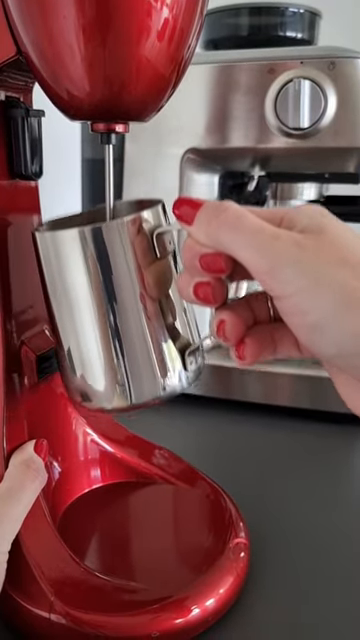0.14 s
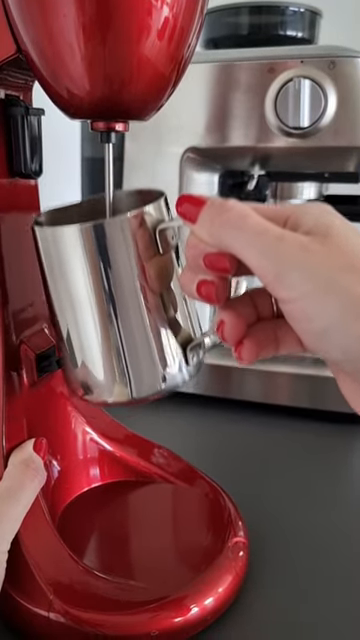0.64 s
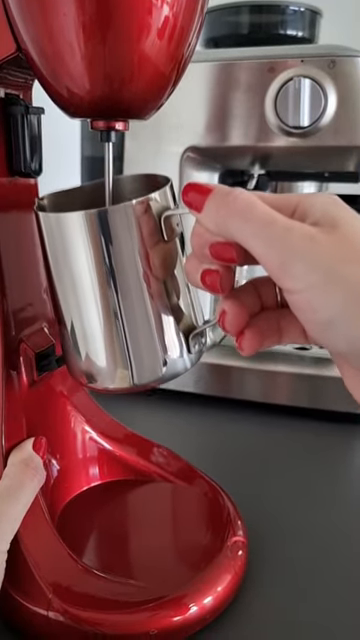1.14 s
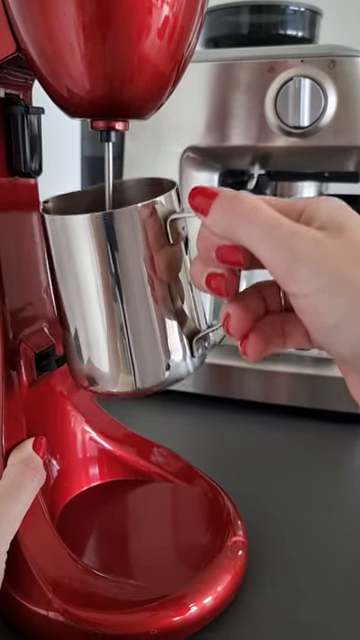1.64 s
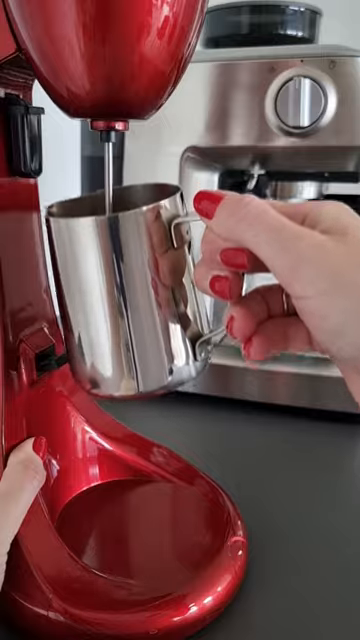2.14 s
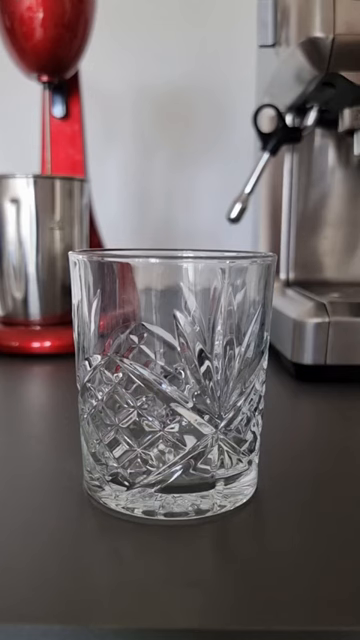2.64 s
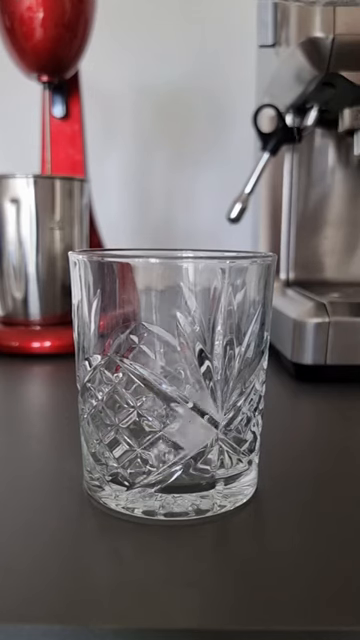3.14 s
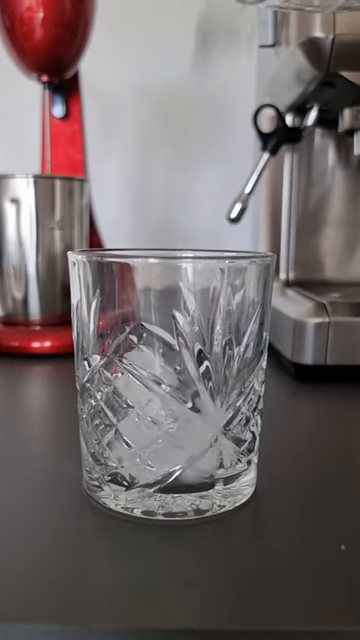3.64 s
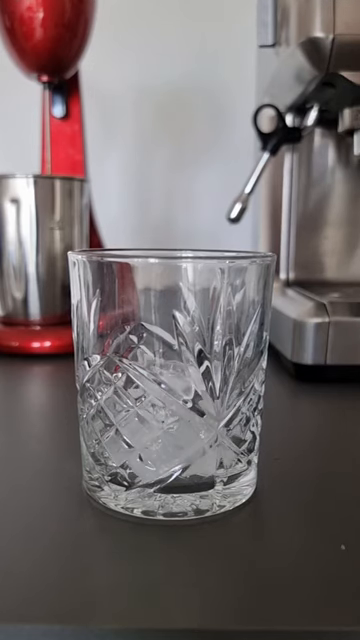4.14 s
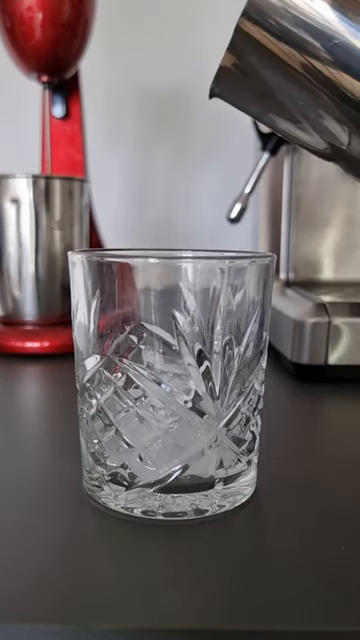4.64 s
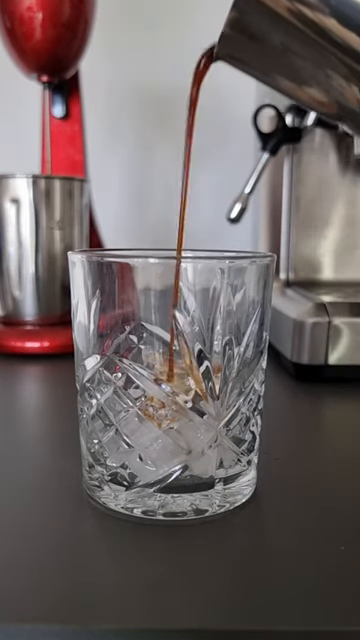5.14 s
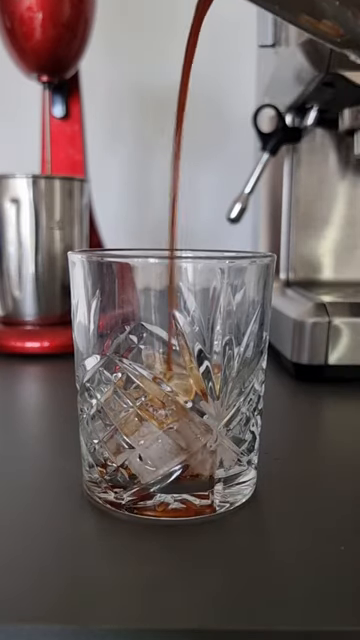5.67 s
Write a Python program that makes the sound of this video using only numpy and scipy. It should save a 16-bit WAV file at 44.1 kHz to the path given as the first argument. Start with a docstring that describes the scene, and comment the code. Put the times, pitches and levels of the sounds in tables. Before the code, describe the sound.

Steady buzzing whine of a handheld-size drink mixer in metal, then ice clattering and ringing in a heavy glass, then faint fridge hum.

```python
"""Spindle mixer, ice in a tumbler, quiet kitchen

Three moments with short fades between them, over a humming refrigerator and a noise floor.
A spindle mixer whines in a steel jug: sines on the orders of its shaft, over coloured noise.
Ice is handled, then dropped into a thick glass tumbler: clicks ring modes of ice, base and worktop, and
paired sines beat as the glass wall rings; feedback delays are the kitchen. Then hum and a thin whine stay."""
import sys
import numpy as np
from scipy import signal
from scipy.fft import rfft, irfft, next_fast_len
from scipy.io import wavfile
from scipy.ndimage import uniform_filter1d

SR = 44100
rng = np.random.default_rng(int(sys.argv[2]) if len(sys.argv) > 2 else 0)


def field_ratio(decibels):
    """Amplitude ratio for a level in dB (20 dB per decade); scalars and array-likes work."""
    return 10 ** (np.asarray(decibels, dtype=float) / 20)


def master(y):
    """Save y as 16-bit WAV."""
    cut = np.clip(np.atleast_2d(y).T, -1, 1)
    pcm = np.round(cut * 32767)  # scale
    wavfile.write(sys.argv[1], SR, pcm.astype(np.int16))


N = 254898

# the three moments; the first starts in full, the last outruns the sound: start/s, end/s
CUTS = [(-.1, 2.354), (2.378, 4.284), (4.306, 5.9)]
MIXER_SIZE = round(CUTS[0][1] * SR / 2) * 2   # samples, an even number
MAINS_HZ = 50
# course of the spindle: t/s, speed/Hz, level of the once-a-turn tone in the middle/dB rms, left over right/dB
SPINDLE = [(0.03, 384.2, -17, 16.0), (0.11, 385.2, -17, 12.0), (0.25, 387.2, -18, 10.5),
           (0.68, 388.5, -15, 9.5), (0.79, 386.7, -16, 10.5), (0.88, 382.6, -21, 16.0),
           (0.95, 383.4, -16, 14.0), (1.23, 382.3, -17, 14.5), (1.35, 379.2, -18, 17.0),
           (1.43, 379.8, -18, 12.5), (1.8, 378.4, -18, 13.0), (2.1, 375.7, -20, 10.0),
           (2.33, 375.8, -21, 15.0)]
# strong motor tones at order x speed + sideband x twice the mains: order, sideband,
# left and right level/dB rms in the jug's first position, the same in its second, lead of the left/rad
TONES = [(1, -1, -46, -60, -40, -44, 1.5), (1, 1, -35, -38, -31, -31, 1.5),
         (2, -1, -41, -46, -37, -40, -2.6), (2, 0, -42, -33, -32, -32, 1.9),
         (3, 0, -28, -33, -27, -40, 0.9), (3, 1, -33, -38, -34, -39, -2.8),
         (4, 0, -28, -34, -27, -34, -2.6), (5, 0, -41, -50, -40, -43, 2.3),
         (6, 0, -31, -28, -43, -33, -2.9), (7, 0, -40, -34, -46, -42, -0.9),
         (7, 1, -42, -35, -40, -33, -0.3), (8, 0, -41, -31, -43, -29, -0.5),
         (8, 1, -41, -36, -47, -35, 2.0), (8, 2, -43, -37, -50, -39, 1.0), (9, -1, -44, -39, -43, -38, 0.5),
         (9, 0, -39, -39, -38, -32, 0.4), (9, 1, -46, -38, -44, -40, 0.0),
         (10, 0, -36, -27.5, -42, -34, 0.3), (11, 0, -43, -37, -42, -44, 2.0),
         (13, 0, -49, -36, -50, -45, -2.8), (13, 1, -52, -40, -55, -44, -0.1),
         (14, -1, -47, -45, -48, -39, 0.4), (16, 1, -38, -42, -45, -46, -1.6),
         (17, 0, -43, -47, -40, -46, -2.3), (20, -1, -43, -38, -48, -47, -0.3),
         (20, 0, -48, -39, -47, -40, 0.4)]
# balance of the mixer's churn, and of the handling rustle: f/Hz, left over right/dB
CHURN_PAN = [(100, -1.5), (400, 1), (600, 0), (950, 3.5), (1370, -5), (1800, 5.5), (2450, 1), (3400, -6.5),
             (5000, -4.5), (8000, -1), (15000, -1.5)]
# phase between the sides, for noise and faint tones: f/Hz, lead of the left/rad
CHURN_LEAD = [(60, 0.27), (400, 1.1), (590, 0.15), (880, 3.1), (1010, 2.2), (1370, 3.4), (1800, 5.9),
              (2100, 4.3), (2400, 9.5), (2900, 5.2), (3250, 15), (3700, 10), (5250, 19), (6500, 21.7),
              (8010, 26.1), (11300, 22.1), (16100, 35)]
# how alike the sides of the room floor and rustle are: f/Hz, likeness/-1 to 1
FLOOR_LIKENESS = [(60, 0.94), (150, 0.4), (400, 0.13), (15000, 0.05)]
# modes of the ice when struck: f/Hz, relative level/dB, T60/s
CRACK = [(2000, -4, 0.0035), (2830, -1, 0.008), (3754, 1, 0.0055), (4780, -3, .005), (5930, 0, 0.004),
         (6650, -8, 0.0095), (7400, -19, 0.021)]
# modes of the thick glass base when struck: f/Hz, relative level/dB, T60/s
KNOCK = [(606, -9.5, .02), (759, -1, 0.011), (910, 2, .029), (1240, -3.5, 0.026), (1644, -1, 0.014)]
# modes of the worktop when struck: f/Hz, relative level/dB, T60/s
THUD = [(209.7, -7, 0.16), (289, -6.5, .08), (415, -1, 0.049)]


def rms_one(x):
    """Scale to unit rms."""
    return x / np.sqrt(np.mean(x ** 2) + 1e-20)


def in_time(rows):
    """Columns of a curve table, one value a sample."""
    s, *columns = np.transpose(rows)
    return [np.interp(np.arange(N) / SR, s, column) for column in columns]


def between(start, end):
    """Gain that fades in over 12 ms at the start and out over 18 ms at the end."""
    t = np.arange(N) / SR
    return np.clip((t - start) / .012, 0, 1) * np.clip((end - t) / .018, 0, 1) ** 2


def at_hz(points, hz):
    """Read a spectrum on a log-frequency axis."""
    point_hz, value = np.transpose(points)
    return np.interp(np.log(hz), np.log(point_hz), value)


def left_over_right(db):
    """Gains of left and right that differ by db."""
    return field_ratio([[db / 2], [-db / 2]])


def drift(rate, size):
    """Slow chance of rms 1: noise through a two-pole lowpass at rate Hz, drawn every 40 samples."""
    r = np.exp(-2 * np.pi * rate * 40 / SR)
    slow = signal.lfilter([1], [1, -2 * r, r * r], rng.standard_normal(size // 40 + 2002))[2000:]
    return np.interp(np.arange(size) / 40, np.arange(len(slow)), rms_one(slow))


def ring(clicks, hz, t60):
    """A two-pole resonator: a unit click sets a sine of about height 1 ringing."""
    r, w = field_ratio(-60 / (t60 * SR)), 2 * np.pi * hz / SR
    return signal.lfilter([0, np.sin(w)], [1, -2 * r * np.cos(w), r * r], clicks + 1e-18)


def banded_noise(spectrum, likeness, pan, lead, patchy_db, size):
    """Stereo noise with colour, likeness, balance and lead by frequency; its level flickers; mid rms near 1."""
    hz = np.maximum(np.arange(size // 2 + 1) * SR / size, 1)
    shared, apart = rfft(rng.standard_normal((2, size))) * field_ratio(at_hz(spectrum, hz))
    alike = np.clip(at_hz(likeness, hz), -1, 1)
    sides = left_over_right(1) ** at_hz(pan, hz) * np.exp(1j * np.outer([1, 0], at_hz(lead, hz)))
    mixed = np.sqrt(1 + alike) * shared + np.sqrt(1 - alike) * apart * [[1], [-1]]
    out = irfft(sides * mixed, size)
    out = out * field_ratio(patchy_db * drift(8.7, size))
    return np.pad(out / np.std(out.mean(axis=0)), ((0, 0), (0, N - size)))


def faint_tones():
    """Rows like those of TONES for every other order and sideband, with chance levels per jug position."""
    # level before the losses and chance below: f/Hz, level/dB rms
    faint = [(300, -64), (700, -57), (950, -60.5), (1600, -44), (2450, -47.5), (3500, -43), (4500, -49.5),
             (5300, -45.5), (8000, -55.5)]
    # balance: f/Hz, left over right/dB
    faint_pan = [(950, 3), (1800, 8.5), (2450, -1), (3400, -6), (5000, -2.5), (6300, 3.5), (8000, -7)]
    taken = [(1, 0)] + [tone[:2] for tone in TONES]   # (1, 0) is the once-a-turn tone
    rows = []
    for order in range(1, 22):
        for sideband in range(-2, 3):
            if (order, sideband) in taken:
                continue
            hz = order * SPINDLE[0][1] + sideband * 2 * MAINS_HZ
            level_db = at_hz(faint, hz) - 1.5 * abs(sideband)   # weaker away from the order
            sides_db = level_db + at_hz(faint_pan, hz) / 2 * np.array([1, -1, 1, -1])
            chance_db = np.repeat(rng.normal(0, 0.5, size=2), 2)
            lead = rng.normal(at_hz(CHURN_LEAD, hz), 0.67)   # radians
            rows.append((order, sideband, *(sides_db + chance_db), lead))
    return rows


def motor(waver_db, flutter_db, blur):
    """Shaft orders with sidebands at twice the mains; tilting the jug shifts their levels on each side."""
    size = MIXER_SIZE
    spindle_lead = 0.46   # radians by which the left leads
    speed, tone_db, pan_db = (column[:size] for column in in_time(SPINDLE))
    jug = np.interp(np.arange(size) / SR, (.8, 1.3), [0, 1])   # from first position to second, s
    sides = field_ratio([pan_db / 2, -pan_db / 2])
    middle = np.abs(sides[0] * np.exp(1j * spindle_lead) + sides[1]) / 2
    sides = sides * field_ratio(tone_db) / middle
    # the load on the disc jitters the speed
    turn = 2 * np.pi * np.cumsum(speed * (1 + blur * drift(32, size))) / SR
    torque = 2 * np.pi * 2 * MAINS_HZ * np.arange(size) / SR
    once_a_turn = sides * np.sin([turn + spindle_lead, turn])
    field = field_ratio(-56) * np.sin([torque + 0.7, torque])   # the motor's field hums at twice the mains
    out = once_a_turn + field
    for order, sideband, left_0, right_0, left_1, right_1, lead in TONES + faint_tones():
        phase = order * turn + sideband * torque + rng.uniform(0, 2 * np.pi)
        level_db = np.outer([left_0, right_0], 1 - jug) + np.outer([left_1, right_1], jug)
        level_db += waver_db * drift(1.1, size) + flutter_db * drift(13, size)
        out += field_ratio(level_db) * np.sin([phase + lead, phase])
    return np.pad(np.sqrt(2) * out, ((0, 0), (0, N - size)))   # root 2 makes the levels rms


def churn():
    """Air, brushes and froth: coloured noise that flickers a little."""
    # colour: f/Hz, relative density/dB per Hz
    colour = [(60, -20.5), (200, -18.5), (420, 2), (600, -8.5), (950, -11), (1150, 2.5), (1350, -2),
              (1700, -6.5), (2150, -12.5), (2450, -4.5), (3300, -1), (4450, -3.5), (5100, -6), (5600, -7),
              (7500, -1.5), (10300, -14.5), (13300, -4.5), (15500, -9), (16000, -45)]
    # how alike the sides are: f/Hz, likeness/0-1
    likeness = [(60, 0.5), (300, .5), (590, 0), (900, 0.6), (1370, .9), (2100, 0.2), (2450, 0.6), (2900, 0),
                (3500, 0.4), (4500, 0.3), (8000, .45), (15000, 0.2)]
    return field_ratio(-28) * banded_noise(colour, likeness, CHURN_PAN, CHURN_LEAD, patchy_db=1.0, size=MIXER_SIZE)


def hum():
    """The compressor's slightly wandering tones beat against each other."""
    # tones of the refrigerator: f/Hz, relative level/dB
    hum_tones = [(50, 3.5), (62, -19), (36.9, -20.5), (101, -21)]
    t = np.arange(N) / SR
    out = 0
    for hz, level_db in hum_tones:
        level = field_ratio(level_db + .4 * drift(4, N))
        out = out + level * np.sin(2 * np.pi * hz * t + .15 * drift(2.7, N) + [[.4], [0]])
    return out * left_over_right(-2.4)


def room_floor():
    """Steady noise of room and microphone, strongest in the bass."""
    # colour: f/Hz, relative density/dB per Hz
    colour = [(44, -28), (75, 1), (123, -16), (188, -16.5), (250, -23.5), (345, -19.5), (420, -28),
              (600, -27.5), (800, -24), (1500, -35), (2600, -43.5), (16000, -55)]
    pan = [(60, -0.55), (16000, -1.5)]   # f/Hz, left over right/dB
    return banded_noise(colour, FLOOR_LIKENESS, pan, CHURN_LEAD, patchy_db=0.0, size=N)


def handling():
    """Ice handled nearby: small ticks, each a noise burst with a short ring, over a faint rustle."""
    # ticks: t/s, burst strength before filtering/dB, ring f/Hz
    ticks = [(2.435, -39, 2300), (2.607, -43.5, 2650), (2.652, -26, 2880), (2.7016, -7, 4240),
             (2.7263, -18, 3760), (2.9452, -30, 3203), (2.9694, -35.5, 3190)]
    # course of the rustle: t/s, level/dB
    rustle_levels = [(2.38, -73), (2.43, -65), (2.6, -67), (2.72, -59.5), (2.9, -65), (3.02, -64)]
    # colour of the rustle: f/Hz, relative density/dB per Hz
    rustle_colour = [(65, -36.5), (110, -4.5), (288, -12.5), (350, -6), (584, -23.5), (1160, -19),
                     (1860, -22), (3160, -24), (4320, -28.5), (12000, -52), (15600, -86.5), (22000, -120)]
    out = np.zeros((2, N))
    for s, strength_db, hz in ticks:
        decay_db = -60 * np.arange(900) / SR / 0.038   # T60 38 ms
        burst = rng.standard_normal((2, 900)) * field_ratio(strength_db + decay_db)
        at = round(s * SR)
        out[:, at:at + 900] += np.diff(burst * 0.2 + 0.025 * ring(burst, hz, .008), prepend=0)
    rustle = banded_noise(rustle_colour, FLOOR_LIKENESS, CHURN_PAN, CHURN_LEAD, patchy_db=3.0,
                          size=round(4.3 * SR))
    tick_band = signal.butter(2, (880, 4200), "band", fs=SR, output="sos")
    return signal.sosfilt(tick_band, out) + field_ratio(in_time(rustle_levels)[0]) * rustle


def ice_band(x):
    """Band of the ice sounds: little deep bass, little top treble."""
    return signal.sosfilt(signal.butter(6, (206, 11000), "band", fs=SR, output="sos"), x)


def rattle(per_s):
    """Cubes slide and settle: dense uneven contacts ring the ice, base and worktop modes, cut shorter."""
    # course of the rattle: t/s, bright level/dB rms, dull level/dB rms
    slides = [(3.028, -47, -48.5), (3.1, -44, -40), (3.204, -51.5, -33.5), (3.572, -35, -39.5),
              (3.712, -50, -45.5), (3.8, -45, -38), (3.922, -50.5, -33.5), (4.2, -61, -76.5)]
    bright_db, dull_db = in_time(slides)
    touch = (rng.random((2, N)) < per_s / SR).astype(float)
    touch *= field_ratio(5.0 * np.minimum(rng.exponential(1, (2, N)), 4)) * rng.choice([-1, 1], (2, N))
    bright = rms_one(sum(field_ratio(level_db) * ring(touch, hz, t60 * 0.87) for hz, level_db, t60 in CRACK))
    dull = rms_one(sum(field_ratio(level_db) * ring(touch, hz, t60 * 0.13) for hz, level_db, t60 in KNOCK + THUD))
    return (field_ratio(bright_db) * bright + field_ratio(dull_db) * dull) * between(slides[0][0], slides[-1][0])


def touches():
    """Every landing and bounce (t/s, crack, knock and thud/dB), with runs of rocking and chatter."""
    # ice landing and bouncing: t/s, crack strength/dB, knock strength/dB, thud strength/dB
    landings = [(3.0357, -21, -7, -18.5), (3.0452, -30.5, -11.5, -16.5), (3.1211, -28.5, -14.5, -25),
                (3.257, -34, -10.5, -29.5), (3.2635, -28, -22, -22.5), (3.4904, -22, -11, -20),
                (3.6634, -32, -34.5, -40.5), (3.714, -17.5, -11, -24.5), (3.7254, -21.5, -29, -22.5),
                (3.7559, -30, -44, -24.5), (3.8103, -50, -30, -31.5), (3.9412, -23.5, -48, -33)]
    # a cube rocks on the base, three touches: t/s, gap/s, crack strength of the first/dB
    rocking = [(3.1553, .032, -39), (3.5538, 0.034, -38)]
    # a cube skids against the glass wall: start/s, end/s, crack strength midway/dB
    chatter = [(3.2815, 3.3294, -24), (3.362, 3.3934, -32.5), (3.8445, 3.8681, -19.5)]
    rows = list(landings)
    for s, gap_s, db in rocking:
        for k in range(3):
            crack_db = db - 1.5 * k   # each touch is weaker
            rows.append((s + k * gap_s, crack_db, crack_db + 12.5, crack_db + 10))
    for start, end, db in chatter:
        for along in np.linspace(-1, 1, round((end - start) / .01) + 1):   # about 10 ms apart
            s = (start + end) / 2 + along * (end - start) / 2
            crack_db = db - 12 * along ** 4   # first and last cracks are softer
            rows.append((s, crack_db, db - 9.5, db - 8.5))
    return rows


def struck(modes, at, strength_db, spread_db, crumble):
    """Each blow rings every mode by a click and a dying crumble, with chance strengths on each side."""
    out, tail = np.zeros((2, N)), field_ratio(-60 / (.015 * SR))   # the crumble has a T60 of 15 ms
    for k, (hz, level_db, t60) in enumerate(modes):
        clicks = np.zeros((2, N))
        chance_db = rng.normal(0, spread_db, (len(at), 2))
        clicks[:, at] = field_ratio(strength_db[:, None] + level_db + chance_db).T
        grit = signal.lfilter([crumble], [1, -tail], clicks + 1e-18) * rng.standard_normal((2, N))
        out += ring(clicks * (-1) ** k + grit, hz, t60)
    return np.array([out[0], np.roll(out[1], 12)])   # the right hears it 12 samples late


def blows():
    """Crack of the ice, knock of the base, thud of the worktop, boom of the cupboard, all as struck modes."""
    # boom under the worktop: f/Hz, relative level/dB, T60/s
    cupboard = [(76, -16, 0.11), (96.4, -22.5, 0.19)]
    s, crack_db, knock_db, thud_db = np.transpose(touches())
    at = (s * SR).astype(int)
    crack = struck(CRACK, at, crack_db, spread_db=4.0, crumble=0.3)
    knock = struck(KNOCK, at, knock_db, spread_db=1.5, crumble=.04)
    tumbler = (crack + knock) * left_over_right(4)   # the tumbler stands to the left
    worktop = struck(THUD, at, thud_db, spread_db=4.0, crumble=0.044) * left_over_right(-3)
    boom = struck(cupboard, at, thud_db, spread_db=3.5, crumble=.01)
    return ice_band(tumbler + worktop) + signal.sosfilt(signal.butter(4, 120, fs=SR, output="sos"), boom)


def glass_wall():
    """Twin modes start in step at each clink and beat as they die; the right hears the twins shifted."""
    # ice meets the wall, which stops the old ring and starts a new one:
    # t/s, first mode strength/dB, overtones/dB, top modes/dB, share of the twin mode/0-1
    clinks = [(3.038, -28.5, -44, -26.5, 0.5), (3.058, -23.5, -43, -31, 0.8),
              (3.1171, -23, -37.5, -41, 0.93), (3.1869, -25.5, -53, -49, 0.5),
              (3.276, -26, -34, -43.5, 0.8), (3.2877, -21, -26, -40.5, 0.1), (3.3204, -28, -39, -37, 0.6),
              (3.3781, -31, -48, -38.5, 0.8), (3.4966, -24, -36, -40, 1), (3.5515, -25.5, -49, -50.5, .6),
              (3.587, -28.5, -38.5, -53, 0.6), (3.7266, -11.5, -22, -38, 0.98),
              (3.8506, -17, -24.5, -44, 0), (3.8704, -16, -29.5, -42.5, 0.92),
              (3.9408, -23, -24.5, -39.5, .25)]
    # wall modes, each split in two by the cut pattern:
    # strength column, f/Hz, split/Hz, relative level/dB, T60/s, left over right/dB
    wall = [(0, 2201, 8, -1.5, .48, 7), (1, 5074, 12, 2.5, .22, 2), (1, 8726, 20, -18, .25, 0),
            (1, 9475, 22, -6.5, .33, 0), (1, 10120, 40, -8, .45, 0), (2, 14250, 45, 1.5, .22, 0),
            (2, 15300, 50, -6, .15, 0)]
    s, *strength_db, share = np.transpose(clinks)
    t = np.arange(N) / SR
    last = np.maximum(np.searchsorted(s, t) - 1, 0)   # the latest clink at each sample
    since = np.maximum(t - s[last], 0)
    twin, out = np.clip(share[last], 0, 1), 0
    for column, hz, split_hz, level_db, t60, pan_db in wall:
        fall_db = -60 * since / t60
        decay = field_ratio(fall_db) + field_ratio(-38 + fall_db / 6.5)   # a faint part lasts 6.5 times longer
        decay = decay * field_ratio(strength_db[round(column)][last] + level_db) * (t > s[0]) / (1 + twin)
        decay = uniform_filter1d(decay, size=40) * field_ratio(hz / 4000 * drift(65, N))   # cubes rub the wall
        w = 2 * np.pi * hz * t
        beat = 2 * np.pi * split_hz * since
        left = np.sin(w) + twin * np.sin(w - beat)
        right = np.sin(w + 1.5) + np.sqrt(twin) * np.sin(w + 1.5 - beat + 4.55)
        out = out + decay * left_over_right(pan_db) * [left, right]
    return out * np.sqrt(2)


def kitchen(x):
    """Ten feedback delays a side, duller on every round, then spread by near-allpasses."""
    t60, wall_cut_hz = 0.3, 9800   # s in the bass; lowpass corner of each round
    size = next_fast_len(N + SR)
    z = np.exp(-2j * np.pi * np.arange(size // 2 + 1) / size)   # a delay of one sample
    dull, out = np.exp(-2 * np.pi * wall_cut_hz / SR), []
    for side in x:
        answer = 0
        for k, lag in enumerate((rng.uniform(.005, .04, 10) * SR).astype(int)):
            loop = field_ratio(-60 * lag / SR / t60) * (1 - dull) / (1 - dull * z) * np.exp(lag * np.log(z))
            answer = answer + (-1) ** k * loop / (1 - loop)
        for lag in (47, 131, 223):
            late = np.exp(lag * np.log(z))
            answer = answer * (late - .6) / (1 - 0.51 * late)
        out.append(irfft(rfft(side, size) * answer, size)[:N])
    return signal.sosfilt(signal.butter(8, 9100, fs=SR, output="sos"), np.array(out))


def whine():
    """A thin steady whine: one very faint sine."""
    return field_ratio(-91) * np.sin(2 * np.pi * 3262 * np.arange(N) / SR)


def scene():
    """The three moments, each over hum and floor."""
    # backing of each moment: hum gain/dB, room floor gain/dB
    backing = [(-51.5, -64), (-48.5, -65.5), (-52, -67)]
    ice = blows() + glass_wall() + ice_band(rattle(per_s=2100)) + handling()
    mixer = motor(waver_db=1.65, flutter_db=1.12, blur=.0004) + churn()
    sources = [mixer, ice + field_ratio(-13.5) * kitchen(ice), whine()]
    floor, drone = room_floor(), hum()
    out = 0
    for source, cut, (hum_db, floor_db) in zip(sources, CUTS, backing):
        out = out + between(*cut) * (source + field_ratio(hum_db) * drone + field_ratio(floor_db) * floor)
    return out


def band_limit(x):
    """A steep low-pass at the top of the band."""
    return signal.sosfilt(signal.butter(12, 16510, fs=SR, output="sos"), x)


def record(dry):
    """Hands on the finished mix."""
    return band_limit(dry)


dry = scene()
out = record(dry)
master(out)
```